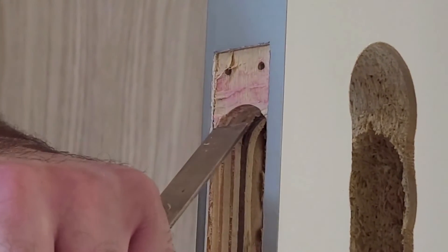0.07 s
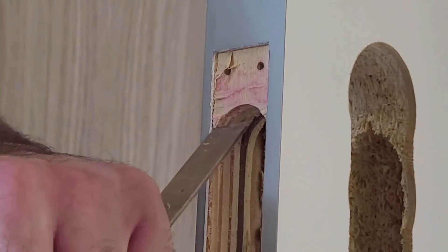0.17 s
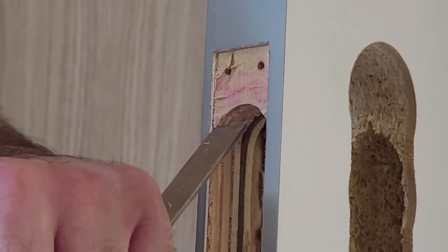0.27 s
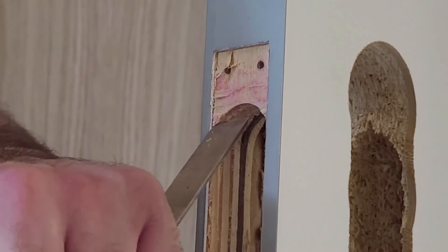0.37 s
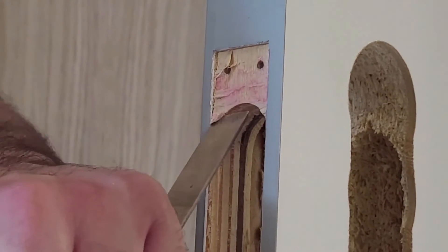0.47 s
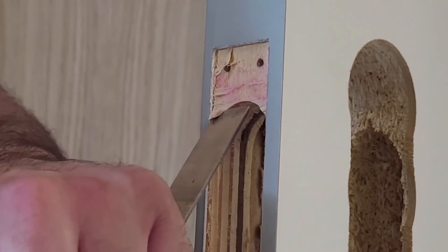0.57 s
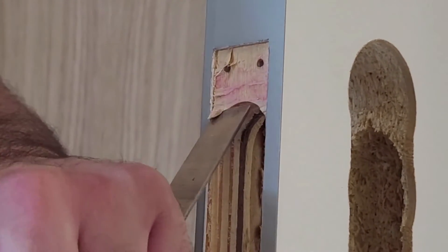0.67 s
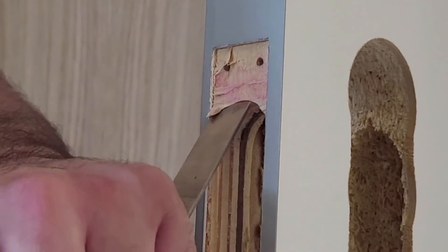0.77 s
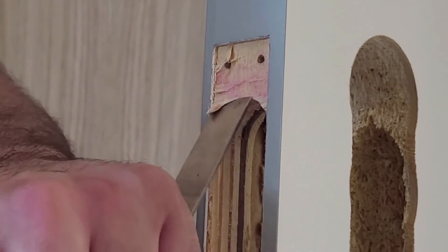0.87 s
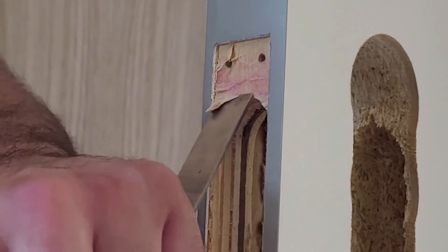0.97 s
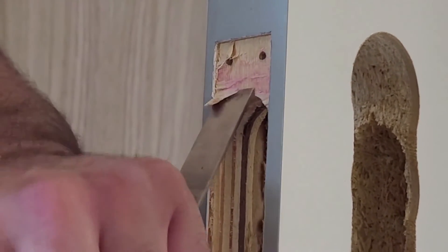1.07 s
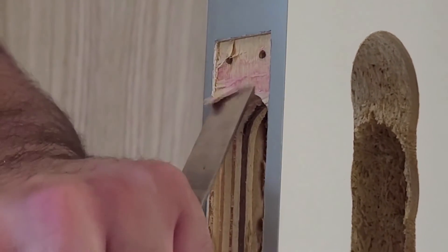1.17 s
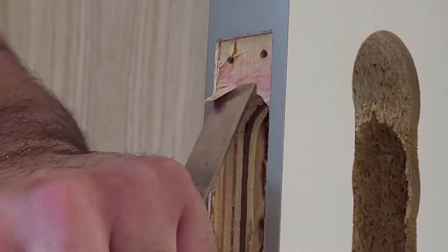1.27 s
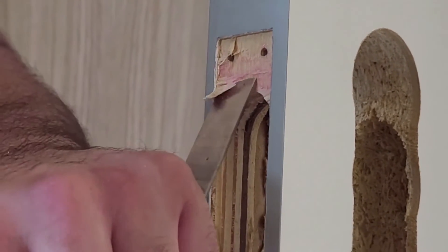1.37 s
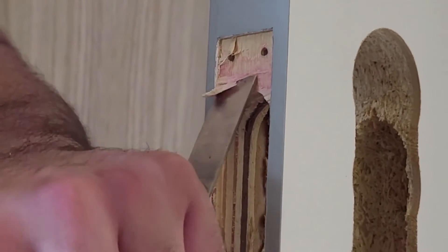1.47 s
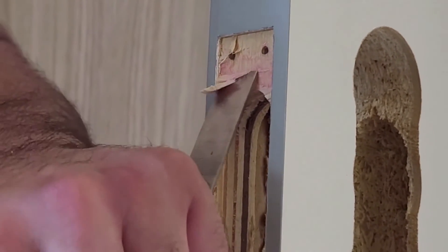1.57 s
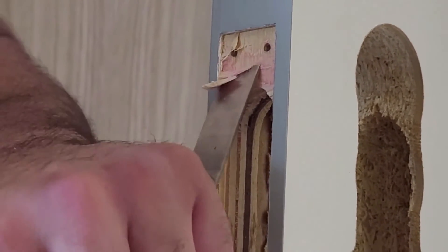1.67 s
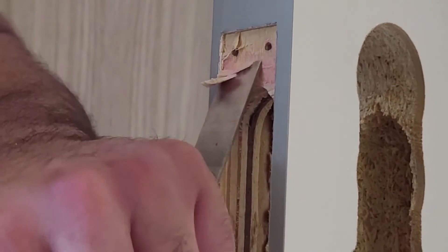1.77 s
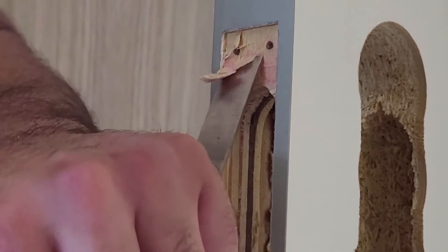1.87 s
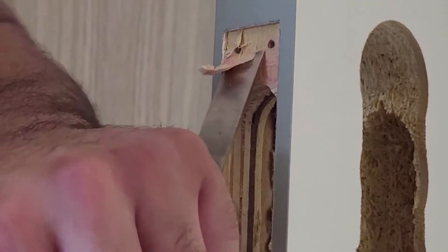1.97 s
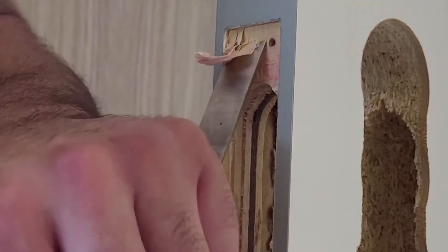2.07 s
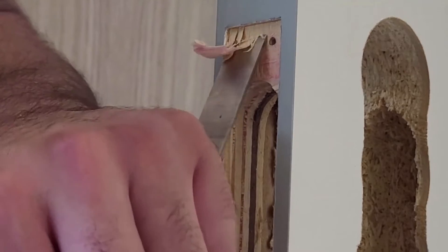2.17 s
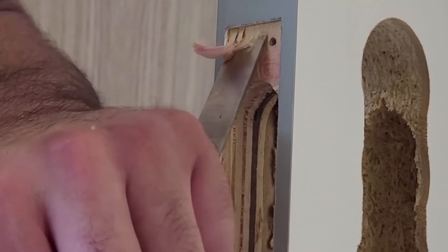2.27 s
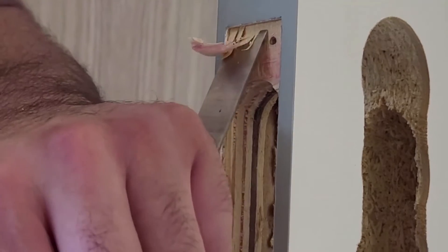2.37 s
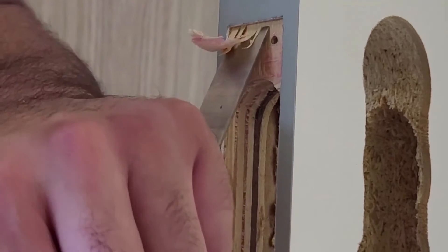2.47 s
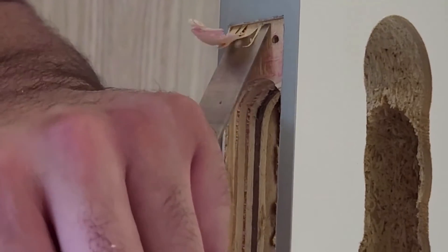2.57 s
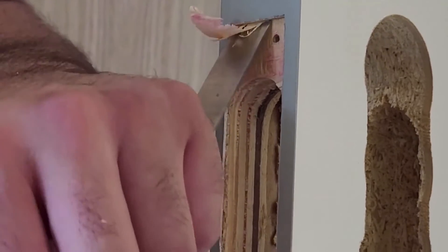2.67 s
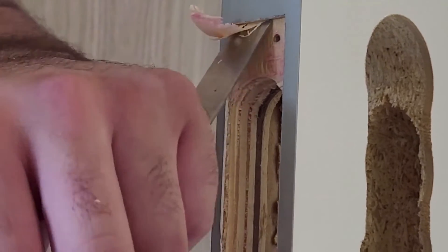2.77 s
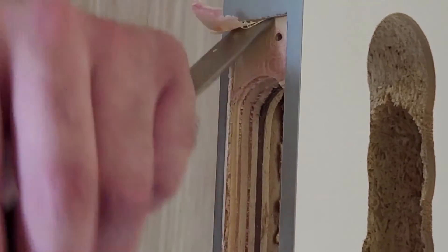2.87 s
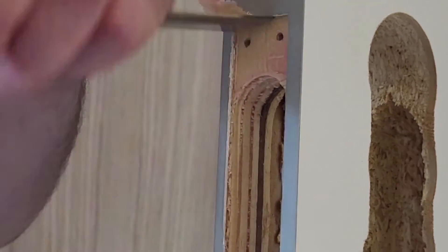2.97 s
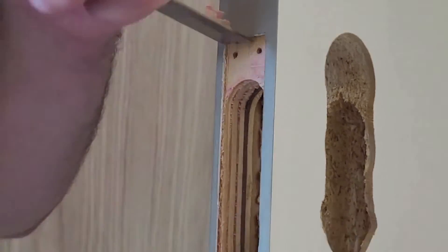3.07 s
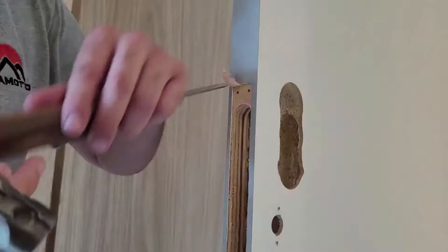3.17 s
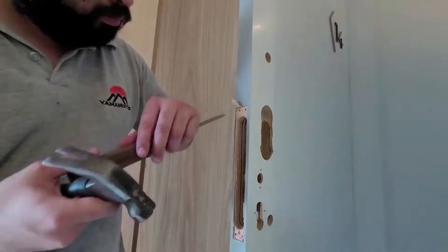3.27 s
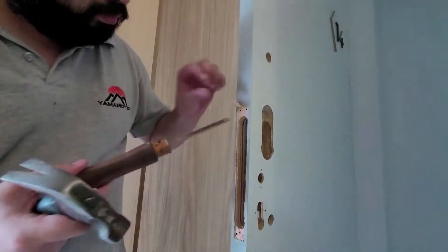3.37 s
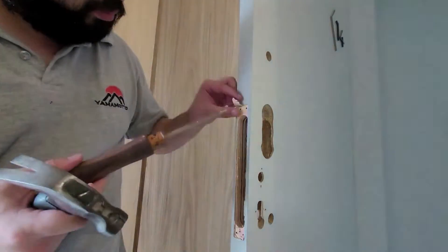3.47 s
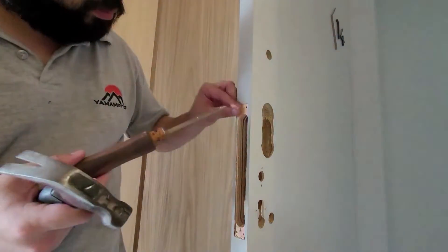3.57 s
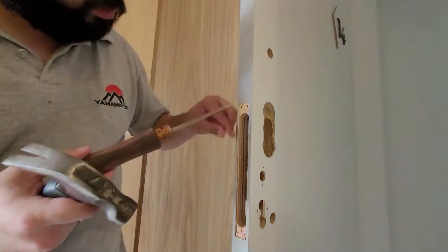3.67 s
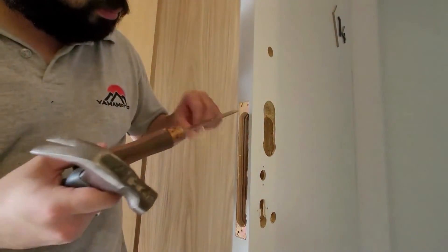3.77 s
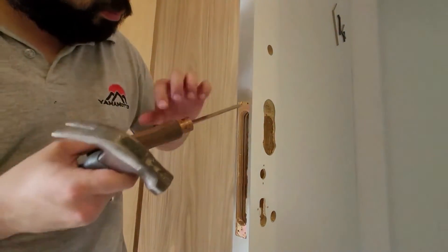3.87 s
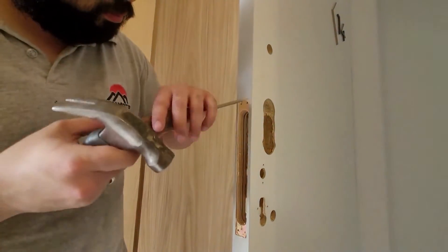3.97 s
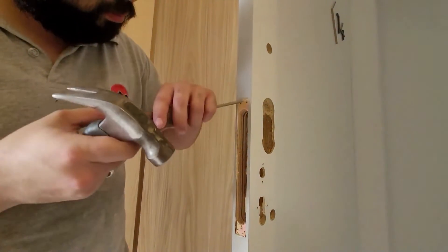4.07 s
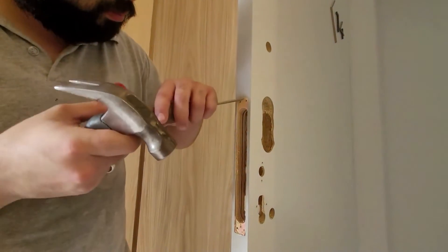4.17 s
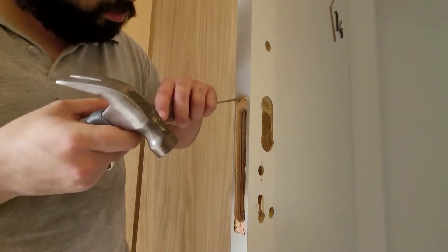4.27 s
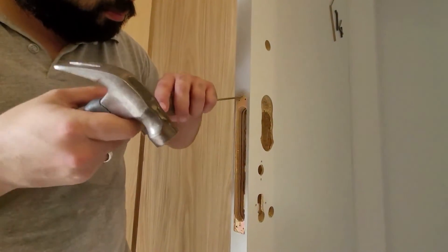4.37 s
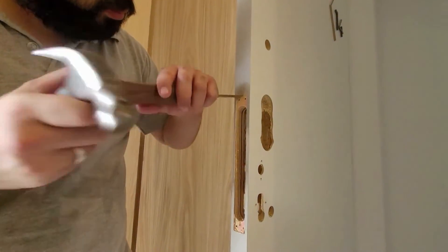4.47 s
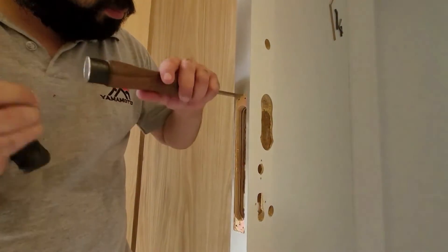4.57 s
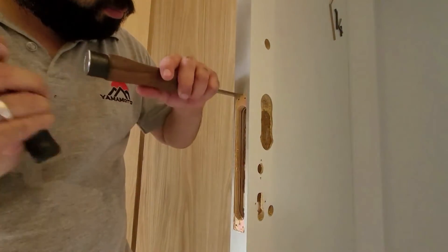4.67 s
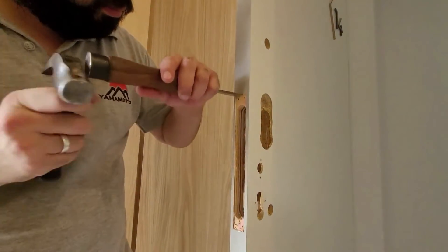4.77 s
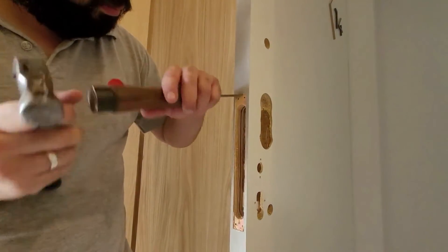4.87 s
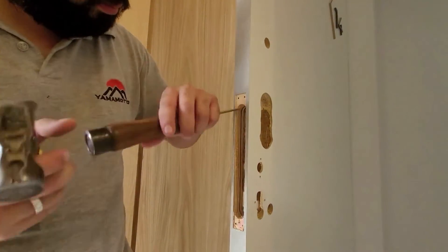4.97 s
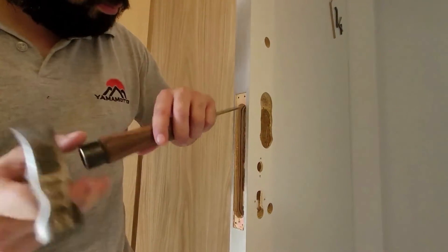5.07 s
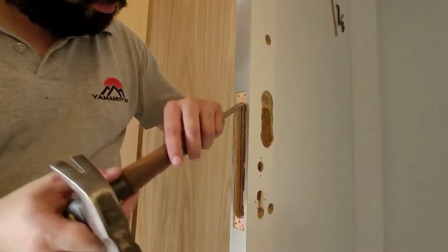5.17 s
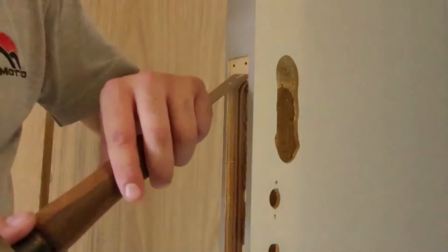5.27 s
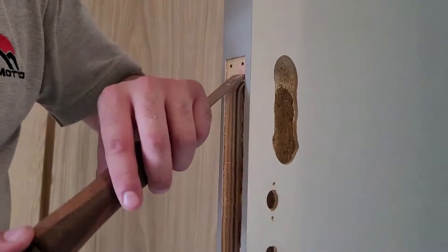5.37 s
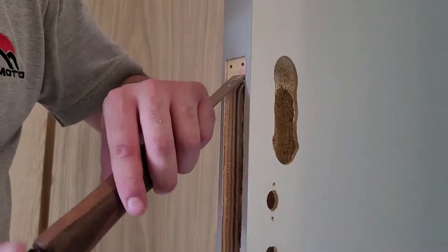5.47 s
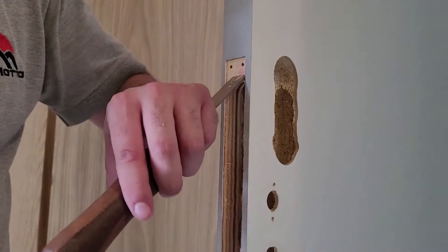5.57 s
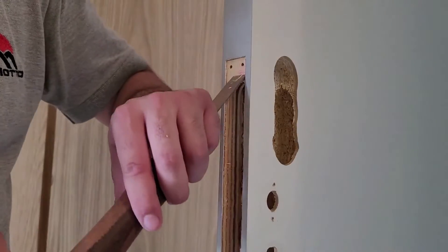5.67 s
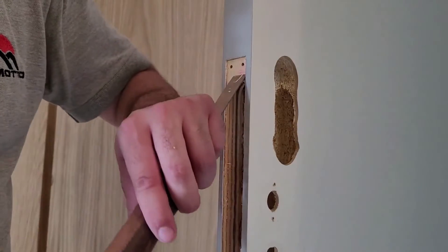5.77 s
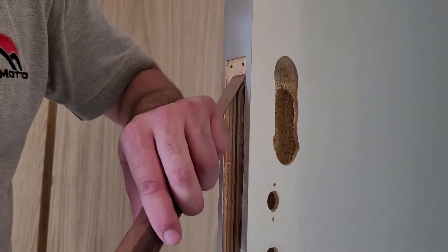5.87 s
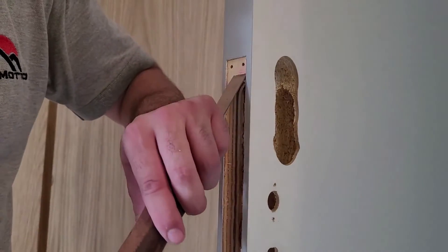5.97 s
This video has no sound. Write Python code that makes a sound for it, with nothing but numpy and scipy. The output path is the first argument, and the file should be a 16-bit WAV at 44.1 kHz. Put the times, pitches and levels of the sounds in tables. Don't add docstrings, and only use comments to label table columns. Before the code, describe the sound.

A fast run of sharp woody chisel taps in a small hard room, quiet handling, two boomy knocks, then four harder blows.

```python
import sys
import numpy as np
from scipy import signal
from scipy.fft import rfft, irfft
from scipy.io import wavfile
from scipy.ndimage import uniform_filter1d

SR = 44100
rng = np.random.default_rng(int(sys.argv[2]) if len(sys.argv) > 2 else 0)


def put_to_file(sound):
    columns = np.atleast_2d(sound).T
    safe = np.clip(columns, -1, 1)
    whole_steps = np.round(safe * 32767)
    wavfile.write(sys.argv[1], SR, whole_steps.astype(np.int16))


def convert_level_to_amplitude(level_db):
    exponent = np.asarray(level_db, float) / 20
    return 10 ** exponent


N = 265658
LEAD = 0.035
T = np.arange(int(0.4 * SR)) / SR


def band(x, hz, width):
    return signal.lfilter(*signal.iirpeak(hz, hz / max(width, 5), fs=SR), x)


def modes(x, table):
    return sum((-1) ** k * convert_level_to_amplitude(db) * band(x, hz, width) for k, (hz, width, db) in enumerate(table))


def colour(x, table):
    hz, db = np.transpose(table)
    n = x.shape[-1]
    f = np.maximum(np.arange(n // 2 + 1) * SR / n, 1)
    gain = convert_level_to_amplitude(np.interp(np.log(f), np.log(hz), db))
    return irfft(rfft(x) * gain, n)


def unit(x):
    return x / np.sqrt(np.mean(x ** 2))


def noise(alike, n=N):
    mid, side = rng.standard_normal((2, n))
    alike = np.clip(alike, -1, 1)
    apart = side * np.array([[1], [-1]])
    return np.sqrt((1 + alike) / 2) * mid + np.sqrt((1 - alike) / 2) * apart


def walk(rate, n=N):
    k = int(SR / rate)
    held = np.repeat(rng.standard_normal(n // k + 1), k)
    return 1.057 * uniform_filter1d(held, k)[:n]


def pan(db):
    return convert_level_to_amplitude(np.array([[db], [-db]]) / 2)


def swell(t, rise, t60):
    return convert_level_to_amplitude(-60 * np.maximum(t - rise, 0) / t60) / (1 + np.exp(-2.6 * t / rise))


def add(out, x, s):
    i = int(round(s * SR))
    out[:, i:i + x.shape[1]] += x[:, :N - i]


def blows():
    # start in seconds, strength in dB, rise in ms, then handle and steel ring in dB
    first_run = [(.351, -28, 11.6, -4, -0.5), (.4647, -23.5, 1.4, -6, 10.5), (.579, -30.5, 15, 3, 7.5),
                 (.6846, -22.5, 1.8, -5, 10), (.792, -24, 10.7, -10, 1.5), (.886, -20.5, 5, -4.5, 2),
                 (.9992, -21, 2.5, -6.5, -0.5), (1.1014, -18, 1.2, -1, 7), (1.212, -22, 9.3, -2, -2),
                 (1.325, -24, 9.2, 0.5, 1.5), (1.4268, -20.5, 2.9, 0, 1.5), (1.5316, -24, 6.9, 2, 1.5),
                 (1.627, -22, 10, 5, 2.5), (1.7484, -24, 6.4, 1.5, 3), (1.8444, -19.5, 1.5, 4.5, 2.5),
                 (1.9525, -23.5, 7.8, 11, 4), (2.074, -21.5, 8.7, -1.5, -0.5), (2.1869, -25.5, 11.4, 3, 5),
                 (2.3025, -18, 3.3, 8, -2), (2.416, -21.5, 5.5, 4, 2), (2.530, -24.5, 7.6, -4, -2.5),
                 (2.6275, -21.5, 2.1, 9.5, 3.5), (2.744, -24, 9.5, 0.5, -1)]
    last_run = [
        (5.6962, -20, 1.7, 0, 3.5),
        (5.7653, -15.5, 1.9, 5.5, -21),
        (5.8318, -20, 5.5, 0, -5.5),
        (5.9509, -17, 1.9, 3.5, -3),
    ]
    return hits(first_run + last_run, 0.22)


def pause_taps():
    # start in seconds, strength in dB, rise in ms, then handle and steel ring in dB
    taps = [
        (4.647, -22.5, 11.3, 1, -26),
        (4.763, -21, 10, -11, 1),
    ]
    return hits(taps, 0.23, edge_db=-3.5)


def touches():
    # start in seconds, strength in dB, rise in ms, then handle and steel ring in dB
    nudges = [(.044, -59, 4.4, 12, -12), (.2696, -50, 3, -4, -21), (3.1428, -46.5, 4.3, -7, -23),
              (3.188, -50, 5.7, 7, -40), (3.229, -56, 0.81, 19.5, -28), (3.435, -48, 7.9, 3, -29),
              (3.4744, -35.5, 4.7, 1, -36), (3.55, -57, 5, 6, 9), (4.122, -43, .6, -24, -6),
              (4.2126, -36, 5.3, 4, -47), (4.2742, -38.5, 9.1, 2, -49), (4.953, -36, 2.5, -8, -26),
              (5.348, -52, 4, -3, -3.5), (5.535, -44, 31, -12, -38), (5.6556, -42.5, 5.7, -14, -18)]
    return hits(nudges, 0.18, edge_db=-8.5)


def hits(table, t60, edge_db=0):
    # time in seconds, handle pitch in Hz, share of solid wood behind the blade from 0 to 1.
    chisel = [(.45, 2860, .05), (.85, 2580, .05), (1.1, 2500, 0.35), (1.5, 2600, 0), (2.08, 2704, 0),
              (2.25, 2500, 1), (2.55, 2300, .85), (2.75, 2720, 1), (3.2, 2400, .9), (3.5, 2840, .9),
              (4.2, 2590, 1), (4.95, 2780, 0.6), (5.721, 2760, 0.2), (5.95, 2450, 0.13)]
    s, pitch, solid = np.transpose(chisel)
    out = np.zeros((2, N))
    for row in table:
        hz = np.interp(row[0], s, pitch)
        backing = np.clip(np.interp(row[0], s, solid), 0, 1)
        add(out, hit(row, hz, backing, t60, edge_db), row[0] - LEAD)
    return out


def hit(row, hz, solid, t60, edge_db):
    # frequency as a multiple of the pitch, width in Hz, level in dB.
    handle_rings = [(0.858, 183.6, -13), (.94, 129.6, -2), (1, 240, 9.5), (1.072, 180, 3.5),
                    (1.358, 465, -4.5), (0.978, 900, -1.5)]
    # frequency in Hz, level in dB per Hz.
    fibres = [(250, -42), (500, -8), (1000, -0.5), (1500, -5.5), (2200, 4.5), (3800, 1), (5000, 0.5),
              (6500, -5), (9000, -33), (16000, -33)]
    # frequency in Hz, width in Hz, level in dB.
    leaf_rings = [(69, 54, -11), (136, 21.6, 1), (291, 56, 2.5), (261, 62, -13), (431, 46, -2)]
    edge_rings = [(701, 22.2, 2), (839, 16.4, -32), (591, 102, -6), (1033, 49, -7)]
    blade_rings = [(7050, 140, 1.5), (7670, 114, -4), (8640, 29, -3)]
    face_rings = [(9770, 340, 1.5), (10100, 500, -3), (9730, 2900, 0)]
    cap_rings = [(12620, 390, -2.5), (13340, 910, -1), (11940, 430, -5), (13800, 200, -12)]

    _, wood_db, rise_ms, handle_db, cap_db = row
    crack_db = 3 - 0.9239 * rise_ms
    door_db = -10 - 10 * solid
    edge_db = edge_db - 9 + 4.5 * solid + 2.5 * rng.standard_normal()
    blade_db = -9 + 1.13 * cap_db
    face_db = -4.5 + 0.35 * cap_db
    t = T - LEAD
    rise = max(rise_ms, 0.3) / 1000
    snap = np.sign(rng.standard_normal(len(t))) * swell(t, 0.00012, 0.0028) * (t < 0.004)
    chips = splinters(t, rise)
    sharp = min(convert_level_to_amplitude(crack_db), 2.6)

    def part(table, db, t60, alike, crack, pan_db, late=0.0):
        table = np.array(table, float)
        table[:, -1] += 1.7 * rng.standard_normal(len(table))
        table[:, 0] *= 1 + 0.012 * rng.standard_normal(len(table))
        room = 0.91 * swell(t - late, rise, t60)
        first_echoes = 0.24 * swell(t - late, rise, 0.12 * t60)
        flutter = convert_level_to_amplitude(2.5 * walk(300, n=len(t)) + 0.57 * walk(64.4, n=len(t)))
        shake = noise(alike, n=len(t)) * (room + first_echoes) * flutter
        gain = convert_level_to_amplitude(db) * pan(pan_db) / np.hypot(1, convert_level_to_amplitude(crack_db))
        return shake + crack * (sharp * snap + chips), table, gain

    def ring(*args, **late):
        shake, table, gain = part(*args, **late)
        return modes(shake, table) * gain

    tuned = np.array(handle_rings) * [hz, 1, 1]
    handle = ring(tuned, wood_db + handle_db + 3, 1.32 * t60, 0.086, 5.6, -14.5)
    shake, grain, gain = part(fibres, wood_db + 2.5, 1.27 * t60, 0.2, 0.18, -3.1)
    near = handle + colour(shake, grain) * gain
    near[0] = np.roll(near[0], 8)
    door = ring(leaf_rings, wood_db + door_db + 20, 1.46 * t60, 0.88, 0.22, 1.6, late=0.0078)
    edge = ring(edge_rings, wood_db + edge_db + 17.5, 1.17 * t60, 0.85, 0.53, 1.0, late=0.0048)
    blade = ring(blade_rings, wood_db + blade_db + 12.5, 1.07 * t60, 1.0, 0.46, 0.8)
    face = ring(face_rings, wood_db + face_db + 7, 0.85 * t60, 0.65, 0.9, 1.5)
    cap = ring(cap_rings, wood_db + cap_db + 6.5, 0.9 * t60, 0.5, 3.1, 4.2)
    return door + edge + patchy(near + blade + face + cap, 2.6, 350)


def splinters(t, rise):
    chance, size = rng.random((2, len(t)))
    snaps = chance < 500 / SR
    return snaps * convert_level_to_amplitude(-1 + 8 * size) * swell(t, rise, 0.13)


def patchy(x, spread_db, width_hz):
    hz = np.arange(0, SR / 2 + width_hz, width_hz) + 1
    db = spread_db * rng.standard_normal(200)[:len(hz)]
    return colour(x, np.c_[hz, db - spread_db ** 2 / 8.7])


def bumps():
    # start in seconds, peak in dB, pitch
    # in Hz, t60 in seconds.
    door_bumps = [(0.044, -28.5, 262.7, 0.17), (0.19, -32.5, 235, 0.42), (0.382, -37.5, 305, 0.089),
                  (2.08, -30.5, 310, .2), (3.169, -46.5, 593, 0.32), (3.32, -40, 557, 0.29),
                  (4.39, -36.5, 291, 0.081), (4.76, -18, 267, 0.32), (4.97, -45, 269.5, 0.24),
                  (5.178, -47, 195.5, 0.56), (5.569, -43.5, 543, 0.25),
                  (0.039, -35.5, 627, 0.15),
        (0.263, -50, 1040, 0.2),
        (3.437, -42, 885, 0.29),
        (4.779, -42, 597, 0.15),
    ]
    out = np.zeros((2, N))
    for s, db, hz, t60 in door_bumps:
        front = 0.51 * np.sin(2 * np.pi * (hz * 0.97 * T + rng.random()))
        back = 0.46 * np.sin(2 * np.pi * (hz * 1.11 * T + rng.random()))
        rattle = 6.8 * band(noise(0.68, n=len(T)), hz, 65)
        shape = convert_level_to_amplitude(db - 1.5) * swell(T - LEAD, 0.011, t60)
        add(out, (front + back + rattle) * shape * pan(1.7), s + 0.0049 - LEAD)
    return out


def puffs():
    # start in seconds, peak in dB.
    gusts = [
        (0.898, -51),
        (1.749, -36),
        (2.078, -37),
        (2.188, -38),
        (4.767, -25),
        (5.854, -50),
        (5.948, -47),
    ]
    out = np.zeros((2, N))
    for s, db in gusts:
        gust = noise(0.2, n=len(T)) * convert_level_to_amplitude(db + 27) * swell(T - LEAD, 0.0072, 0.038)
        thump = band(band(gust, 40, 60), 40, 53)
        add(out, thump * pan(10.6), s - LEAD)
    return out


def room_tone():
    # time in seconds, room tone level in dB.
    ducking = [(0.0, -41), (0.3, -47.5), (1.2, -47.5), (2.75, -43.5), (2.93, -52.5), (3.19, -53.5),
               (3.4, -50.5), (3.54, -45), (3.86, -47), (4.2, -48), (4.74, -47), (4.98, -57), (5.1, -60.5),
               (5.21, -56), (5.33, -58.5), (5.5, -52), (5.68, -48.5), (6.02, -41.5)]
    # frequency in Hz, level in dB per Hz.
    air_colour = [(15, -51), (25, -10.5), (118, -2.5), (378, -7), (510, -14.5), (651, -12.5), (1030, -17.5),
                  (1640, -23.5), (2090, -15), (4480, -25), (7510, -36), (12600, -35), (15200, -34),
                  (16500, -79)]
    # frequency in Hz, width in Hz, level in dB.
    room_hums = [(134, 12, -21), (503, 7.2, 1), (1050, 89, -11.5), (1543, 87, -14), (4500, 650, -27.5),
                 (10750, 240, -22)]
    s, level = np.transpose(ducking)
    db = np.interp(np.arange(N) / SR, s, level)
    treble_db = 3 - 0.142 * (db - db.mean())
    low = signal.butter(2, 900, fs=SR)
    high = signal.butter(2, 900, "high", fs=SR)
    bass = signal.lfilter(*low, noise(0.88)) * convert_level_to_amplitude(4.2 * walk(10))
    treble = signal.lfilter(*high, noise(0.13)) * convert_level_to_amplitude(treble_db + 3.6 * walk(4.475))
    air = bass + treble
    hum_hz = 120 + 3 * walk(3.6)
    hum = convert_level_to_amplitude(-7.5 + 1.04 * walk(11)) * np.sin(2 * np.pi * np.cumsum(hum_hz) / SR)
    return (unit(colour(air, air_colour) + 1.02 * modes(air, room_hums)) + hum) * convert_level_to_amplitude(db)


def scene():
    return blows() + pause_taps() + touches() + bumps() + puffs() + room_tone()


def low_pass(x):
    return signal.sosfilt(signal.butter(12, 16800, fs=SR, output="sos"), x)


def record(dry):
    rounded = 0.85 * np.tanh(dry / 0.85)
    top_cut = signal.ellip(8, 0.2, 60, 16000, fs=SR, output="sos")
    return low_pass(signal.sosfilt(top_cut, rounded))


dry = scene()
out = record(dry)
put_to_file(out)
```